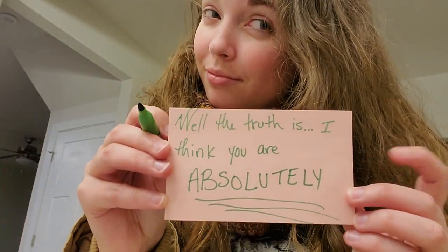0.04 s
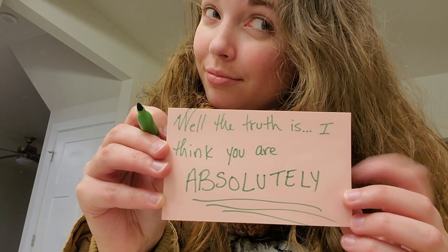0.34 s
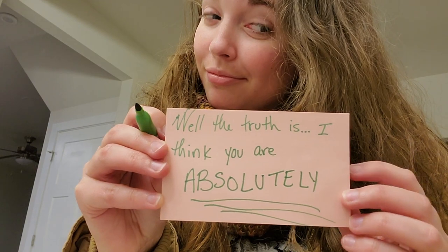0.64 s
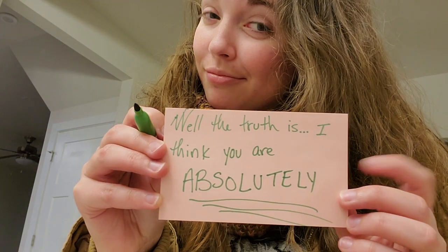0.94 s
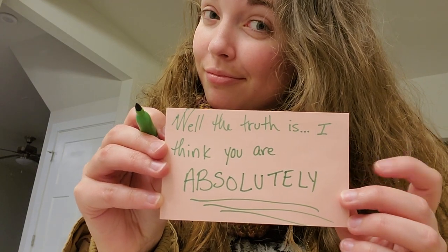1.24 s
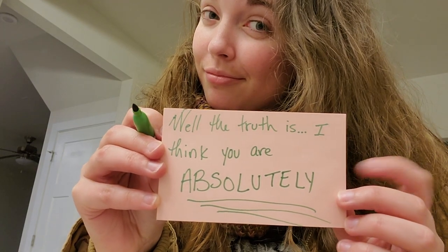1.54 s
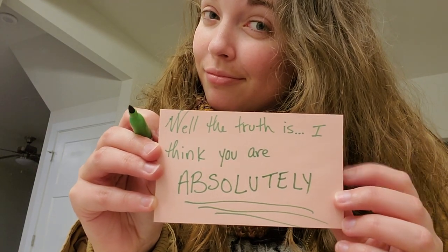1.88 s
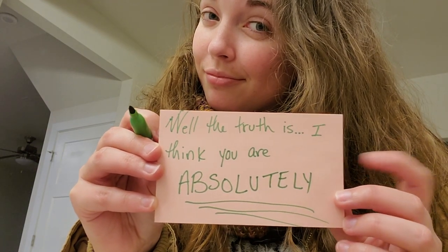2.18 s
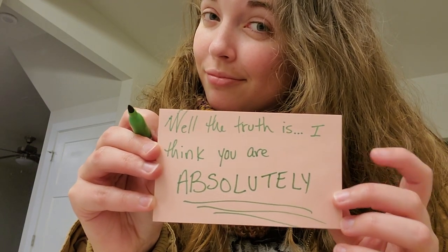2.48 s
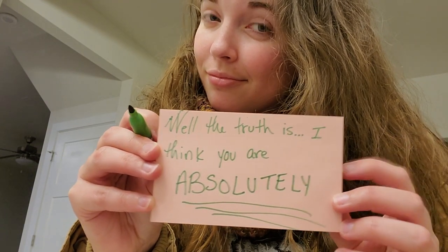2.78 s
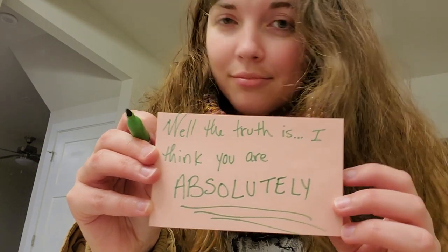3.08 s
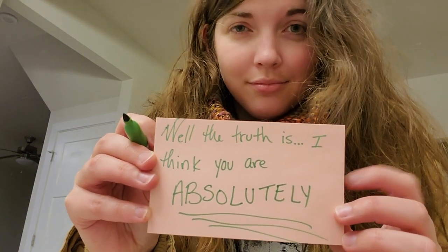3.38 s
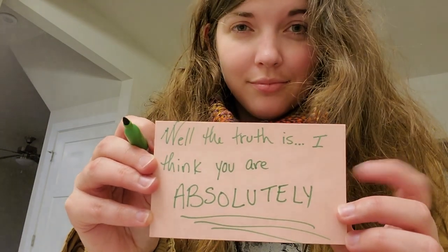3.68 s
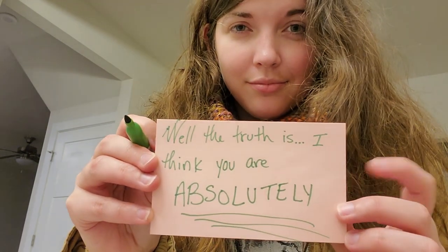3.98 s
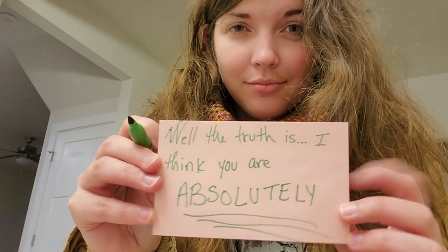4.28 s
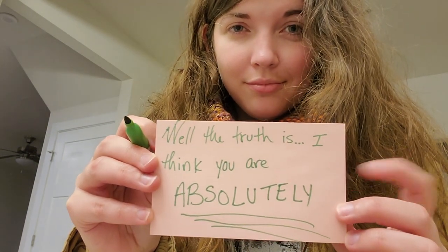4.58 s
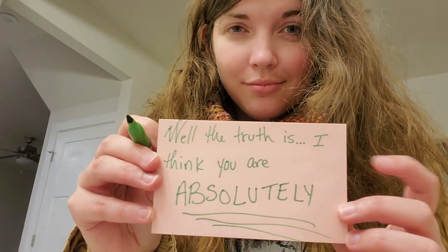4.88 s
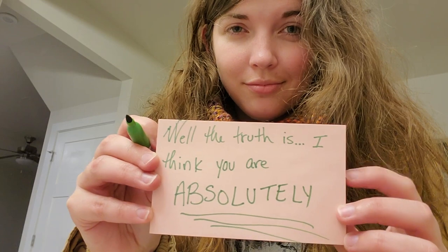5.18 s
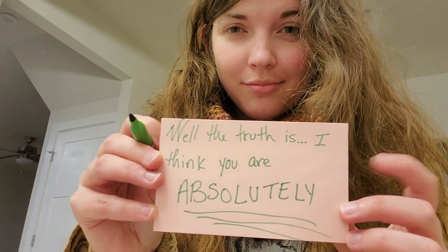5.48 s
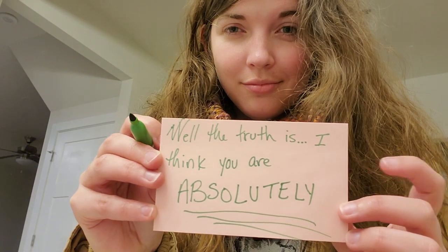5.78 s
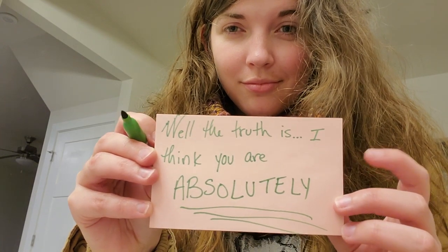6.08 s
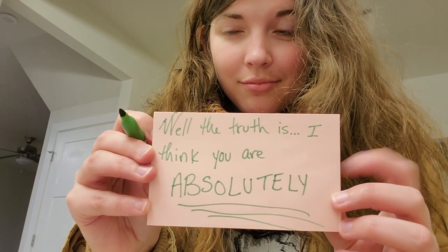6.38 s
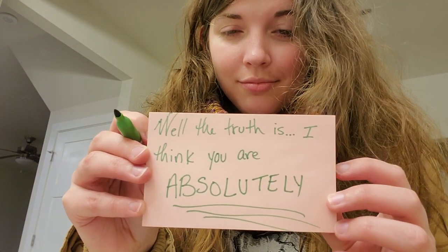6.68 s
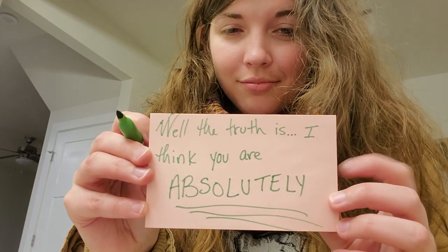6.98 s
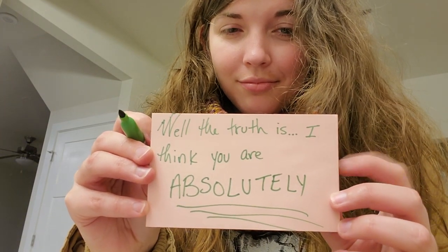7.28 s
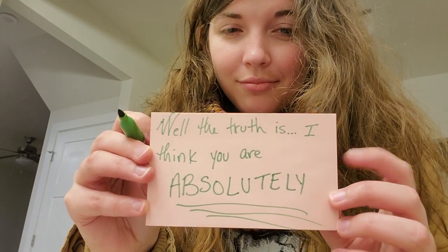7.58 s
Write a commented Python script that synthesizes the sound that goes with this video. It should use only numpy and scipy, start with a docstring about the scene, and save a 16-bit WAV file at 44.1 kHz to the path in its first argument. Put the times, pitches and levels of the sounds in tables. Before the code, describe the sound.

In a small room, a motor hums low, gently throbbing over a rumble and faint hiss. Close to the microphone, a finger drums on a card in quick, light, hollow knocks of uneven strength, each with a little click from the nail. The taps come in runs split by short gaps, then grow lighter as the hum swells a little.

```python
"""A fingertip taps the edge of a hand-held card, about four times a second, close to the microphone.
Each tap is a short hollow knock, with a snap from the edge and a tick from the nail,
and a small room throws it back. Underneath, a motor hums, wandering in speed and
throbbing against a second low tone, over a low rumble and faint hiss."""
import sys
import numpy as np
from scipy import signal
from scipy.fft import rfft, irfft
from scipy.io import wavfile
from scipy.ndimage import uniform_filter1d

SR = 44100
rng = np.random.default_rng(int(sys.argv[2]) if len(sys.argv) > 2 else 0)


def generate_wav(signal):
    """Clip the signal to [-1, 1] and save it as 16-bit WAV at the path in sys.argv[1]."""
    frames = np.transpose(np.atleast_2d(signal))
    scaled = np.clip(frames, -1, 1) * 32767
    pcm = np.round(scaled).astype(np.int16)
    wavfile.write(sys.argv[1], SR, pcm)


N = 341334
TIME = np.arange(N) / SR

# The taps. Each row: start in seconds, then relative levels in dB of the knock, the snap and the tick.
FINGER_TAPS = [(0.168, -50.5, -67, -74), (0.397, -28.5, -51.5, -69), (0.625, -29.5, -55.5, -65),
               (0.859, -25.5, -52.5, -65), (1.106, -20.5, -53.5, -61), (1.348, -27, -58, -75),
               (1.616, -24.5, -58, -71), (1.865, -26.5, -54, -68), (2.09, -22.5, -48.5, -61),
               (2.354, -28.5, -56, -69), (2.576, -20.5, -44.5, -66), (2.804, -21.5, -48.5, -61),
               (3.093, -19.5, -44.5, -58.5), (3.591, -32, -52.5, -65), (3.835, -26, -49, -70),
               (4.056, -27, -51.5, -64.5), (4.314, -26.5, -50.5, -62), (4.769, -21, -46, -63.5),
               (4.976, -31.5, -51.5, -62), (5.16, -34.5, -49.5, -62), (5.372, -27, -54, -68),
               (5.578, -30.5, -44.5, -62.5), (5.691, -42, -67, -71), (6.228, -36, -49, -65),
               (6.447, -27.5, -52.5, -69), (6.678, -25, -52, -64), (6.929, -26, -53.5, -69),
               (7.151, -35, -58, -66), (7.33, -37, -49.5, -64), (7.5, -38.5, -54, -70.5),
               (7.659, -38.5, -50.5, -64.5)]


def gain_of(db):
    """Turns decibels into a number to multiply by."""
    return 10 ** (np.asarray(db) / 20)


def unit_level(x):
    """Scales a sound so that its average level (rms) is 1."""
    return x / np.sqrt(np.mean(x ** 2) + 1e-20)


def at_pitch(rows, hz):
    """Looks up a table at any pitch, sliding between its rows."""
    pitches, values = np.transpose(rows)
    return np.interp(np.log(hz + 1), np.log(pitches + 1), values)


def curves(rows):
    """Turns a table of moments into one curve over time for each value column."""
    times, *columns = np.transpose(rows)
    return [np.interp(TIME, times, column) for column in columns]


def pan(db):
    """Left and right gains: plus moves a sound to the left, minus to the right."""
    return gain_of(np.array([db, -db]) / 2).reshape(2, -1)


def drift(rate_hz):
    """Slow random wandering, about 1 in size."""
    hz = np.fft.rfftfreq(N, 1 / SR)
    return unit_level(irfft(rfft(rng.standard_normal(N)) * np.exp(-(hz / rate_hz) ** 2), N))


def tone(hz, db, waver_db):
    """A pure tone that follows a pitch curve while its level wavers."""
    turns = np.cumsum(hz * np.ones(N)) / SR
    return np.sqrt(2) * gain_of(db + waver_db * drift(9.1)) * np.sin(2 * np.pi * turns)


def click(colour, size=2048):
    """The shortest click with the given mix of low and high pitches; its peak is 1."""
    log_gain = np.log(gain_of(at_pitch(colour, abs(np.fft.fftfreq(size, 1 / SR)))))
    spectrum = np.exp(np.conj(signal.hilbert(log_gain)))  # packs the energy at the start
    pulse = np.fft.ifft(spectrum).real[:size // 2]
    return pulse / abs(pulse).max()


def noise(colour):
    """Stereo noise with the given mix of low and high pitches; the bass is alike on both sides."""
    # Where the noise leans. Each row: pitch in Hz, left minus right in dB.
    balance = [(100, 2), (300, -4.5), (800, -4), (1600, 7.5), (3000, 0.5), (16000, -0.5)]
    # How alike the two sides are. Each row: pitch in Hz, likeness from 0 to 1.
    likeness = [(30, 0.54), (120, 0.77), (300, 0.59), (700, 0.0043), (1500, 0), (16000, 0)]
    hz = np.fft.rfftfreq(N, 1 / SR)
    left, other = rfft(rng.standard_normal((2, N)))
    alike = at_pitch(likeness, hz)
    right = alike * left + np.sqrt(1 - alike ** 2) * other
    pair = np.array([left, right]) * pan(at_pitch(balance, hz))
    return unit_level(irfft(pair * gain_of(at_pitch(colour, hz)), N))


def hiss(level_db=-56.0):
    """Faint, steady background noise, strongest in the bass."""
    # The colour of the hiss. Each row: pitch in Hz, relative level in dB.
    colour = [(30, -25), (110, 2), (170, -4), (290, -1), (420, -7.5), (750, -19), (1050, -20.5),
              (2000, -24), (3000, -24.5), (5000, -31), (7600, -39), (9500, -35), (11500, -30),
              (16000, -30.5)]
    return gain_of(level_db) * noise(colour)


def rumble(swell_db, level_db=-51.5, follow=0.43):
    """The room's low rumble, which follows part of the given rise and fall in level."""
    # The colour of the rumble. Each row: pitch in Hz, relative level in dB.
    colour = [(20, -44), (33, -37), (44, -7), (60, -3), (73, -7), (90, -3), (112, -3), (130, -9),
              (190, -7.5), (240, -14), (500, -29), (1500, -58)]
    return noise(colour) * gain_of(level_db + follow * swell_db)


def faint_tones():
    """Four faint low tones that waver in pitch and level."""
    # Each row: centre pitch in Hz, centre level in dB.
    tones = [(59.6, -58), (88, -55), (120, -61.5), (302, -67.5)]
    return sum(tone(hz + 0.73 * drift(1.58), db, waver_db=4.0) for hz, db in tones)


def motor_hum(throb_hz=5.85, drone_db=-50.0):
    """A motor hums at 1, 2, 3 and 4 times its turning speed, over faint tones and rumble."""
    # The wandering speed. Each row: time in seconds, turns per second.
    speeds = [(0, 48.3), (0.7, 48.4), (1.7, 46.6), (2.7, 46.9), (4.3, 48.6), (5.3, 48.5), (6, 47.6),
              (7.74, 48.2)]
    # The hum swells and sinks. Each row: time in seconds, level of the lowest tone in dB.
    hum_levels = [(0, -54), (0.5, -41.5), (1.05, -46), (1.45, -50.5), (2.3, -54), (3.6, -49), (4.45, -42),
                  (5.15, -39.5), (5.62, -36.5), (5.85, -50.5), (6.6, -38), (6.95, -45), (7.3, -36),
                  (7.74, -39)]
    # The hum's colour drifts. Each row: time in seconds, second tone in dB before the swell, third in dB.
    overtones = [(0, -45.5, -55.5), (0.6, -42, -59), (1.1, -49.5, -57.5), (1.5, -46, -52),
                 (3.5, -43.5, -54.5), (4.45, -46, -51.5), (5.2, -42.5, -56), (6.3, -49.5, -52.5),
                 (6.95, -53.5, -60.5), (7.3, -52, -45.5)]
    speed, = curves(speeds)
    first_db, = curves(hum_levels)
    second_db, third_db = curves(overtones)
    swell_db = first_db - first_db.mean()
    second_db = second_db + 0.65 * swell_db
    motor = tone(speed, first_db, waver_db=1.9) * pan(6.2)
    motor += tone(2 * speed, second_db, waver_db=0.6) * pan(-2.6)
    motor += tone(3 * speed, third_db, waver_db=0.6)
    motor += tone(4 * speed, second_db - 20.5, waver_db=1.5)
    # this tone lies just above the motor's lowest, so the two throb together
    drone = tone(speed + throb_hz, drone_db + 0.45 * swell_db, waver_db=1.6) * pan(3.3)
    return motor + drone + faint_tones() + rumble(second_db - second_db.mean())


def room_tail(build_s=0.0074):
    """A dense wash of reflections with no note of its own; the treble dies first."""
    # How long the room rings. Each row: pitch in Hz, seconds to fade by 60 dB.
    fade_times = [(150, 0.56), (750, 0.62), (2000, 0.29), (8000, 0.33)]
    t = np.arange(SR) / SR
    scatter = rfft(rng.standard_normal((2, SR)) * gain_of(-60 * t / fade_times[1][1]))
    wash = irfft(scatter / abs(scatter), SR)  # all pitches equally strong
    wash /= np.sqrt(abs(uniform_filter1d(wash ** 2, 400, axis=1)) + 1e-20)  # steady in level
    hz, frame_s, bands = signal.stft(wash, SR, nperseg=256)
    fade = gain_of(-60 * frame_s / at_pitch(fade_times, hz)[:, None])
    tail = signal.istft(bands * fade, SR, nperseg=256)[1][:, :SR]
    tail *= 1 - np.exp(-(t / build_s) ** 2)  # the first walls are a few metres away
    return tail / np.linalg.norm(tail, axis=1, keepdims=True)


def room(direct, tail_db=-5.5, echo_s=0.082, echo_db=-21.5, tail_count=4):
    """The hand shifts between taps, so they take turns among a few room tails; a far wall answers late."""
    # The colour of the reflections, weak at the main note, which the card beams at the microphone.
    # Each row: pitch in Hz, boost or cut in dB.
    colour = [(200, -4), (450, 4), (580, -1), (760, -7.5), (900, -3), (1100, 3.5), (1500, 3), (2200, 5),
              (8000, 10.5)]
    mono = direct.mean(0)
    source = irfft(rfft(mono) * gain_of(at_pitch(colour, np.fft.rfftfreq(N, 1 / SR))), N)
    turn = np.searchsorted(np.transpose(FINGER_TAPS)[0], TIME + 0.018) % tail_count
    tails = sum(signal.oaconvolve((source * (turn == k))[None], room_tail(), axes=1)[:, :N]
                for k in range(tail_count))
    echo = np.pad(mono, (round(echo_s * SR), 0))[:N]
    return (gain_of(tail_db) * tails + gain_of(echo_db) * echo) * pan(-6.5)


def at_every_tap(levels_db, sound, delay_s):
    """Plays one sound just after every tap, at that tap's level."""
    blows = np.zeros(N)
    starts = np.round((np.transpose(FINGER_TAPS)[0] + delay_s) * SR).astype(int)
    blows[np.clip(starts, 0, N - 1)] = gain_of(levels_db)
    return -signal.oaconvolve(blows, sound)[:N]


def nail_ticks(levels_db, scrape_s=0.0011):
    """The nail scrapes the paper for a moment: a tiny burst of friction, new at each tap."""
    # The colour of the tick. Each row: pitch in Hz, relative level in dB.
    colour = [(500, -15), (1800, -7), (2700, -2.5), (4000, -8), (5600, -16), (8000, -21), (11000, -20.5),
              (16000, -24)]
    fade = np.exp(-np.arange(SR // 50) / SR / scrape_s)
    scrapes = at_every_tap(levels_db, fade, delay_s=0.0004) * rng.standard_normal((2, N))
    return signal.oaconvolve(scrapes, click(colour)[None], axes=1)[:, :N] * pan(-10.0)


def edge_snaps(levels_db, delay_s=0.00076, left_lag_s=0.00017):
    """The card's edge snaps at each tap; the click reaches the left side a little later."""
    # The colour of the snap. Each row: pitch in Hz, relative level in dB.
    colour = [(200, -9.5), (600, -31), (1000, 5), (1400, 3.5), (1750, -4), (2200, -39), (6000, -62)]
    snap = click(colour)
    return np.array([at_every_tap(levels_db, snap, delay_s + lag) for lag in (left_lag_s, 0)]) * pan(-5.5)


def knock(level_db, contact_s=0.001224, firm_db=-22):
    """The soft fingertip pushes for about a millisecond, so only the card's low notes ring."""
    # The card's notes. Each row: pitch in Hz, relative level in dB, seconds to fade 60 dB on a firm tap.
    notes = [(308, -25, 0.019), (640, -7, 0.008), (758.3, 2, .028), (983, -49, 0.004), (1650, -5, 0.017)]
    t = np.arange(SR // 10) / SR
    length = np.exp(0.02 * min(level_db - firm_db, 0))  # a lighter tap lingers and damps the card
    tuning = 1 + 0.008 * rng.standard_normal()  # the finger never lands on quite the same spot
    ring = np.zeros(len(t))
    for k, (hz, db, fade_s) in enumerate(notes):
        direction = (-1) ** k  # neighbouring notes swing opposite ways, so the ring takes a cycle to build
        ring += direction * gain_of(db - 60 * t / (fade_s * length)) * np.sin(2 * np.pi * hz * tuning * t)
    push = np.sin(np.pi * np.minimum(t / contact_s, 1)) ** 2
    sound = signal.fftconvolve(push, ring)[:len(t)]
    return -gain_of(level_db) * sound / abs(sound).max()


def card_taps(knock_boost_db=0.55, snap_boost_db=9.5, tick_boost_db=2.5):
    """The knock, snap and tick of each tap, to the right of the microphone."""
    starts, knock_db, snap_db, tick_db = np.transpose(FINGER_TAPS)
    knocks = np.zeros(N)
    for start_s, level_db in zip(starts, knock_db):
        sound = gain_of(knock_boost_db) * knock(level_db)
        slot = knocks[round(start_s * SR):][:len(sound)]
        slot += sound[:len(slot)]
    return knocks * pan(-7.0) + edge_snaps(snap_db + snap_boost_db) + nail_ticks(tick_db + tick_boost_db)


def scene():
    """Taps and their echoes over the hum and the hiss."""
    taps = card_taps()
    return taps + room(taps) + motor_hum() + hiss()


def record(dry, top_hz=15800):
    """Cuts away the very highest treble."""
    low_pass = signal.firwin(511, top_hz, window=("kaiser", 9), fs=SR)
    return signal.oaconvolve(dry, low_pass[None], "same")


dry = scene()
out = record(dry)
generate_wav(out)
```